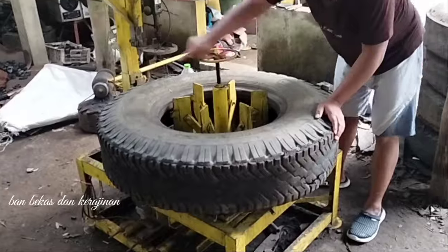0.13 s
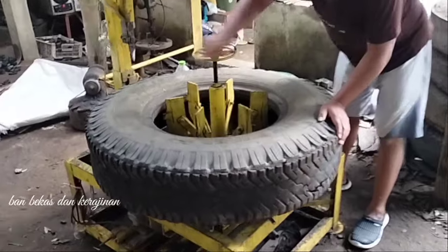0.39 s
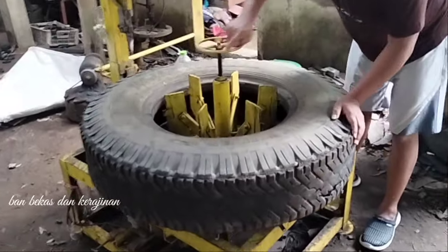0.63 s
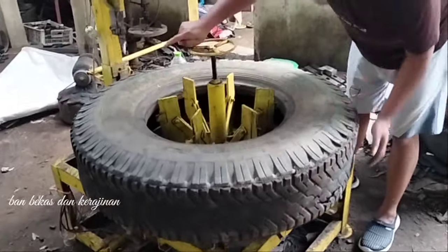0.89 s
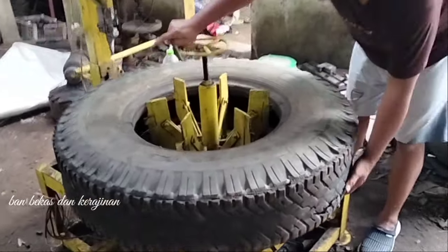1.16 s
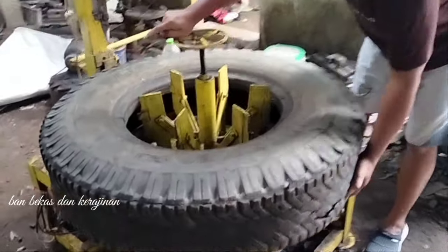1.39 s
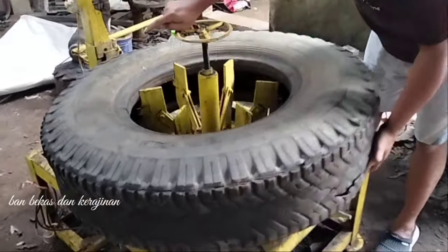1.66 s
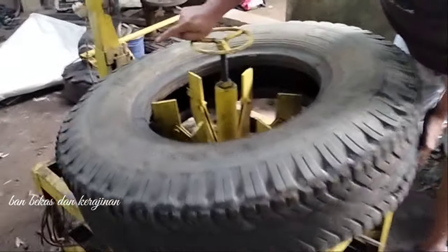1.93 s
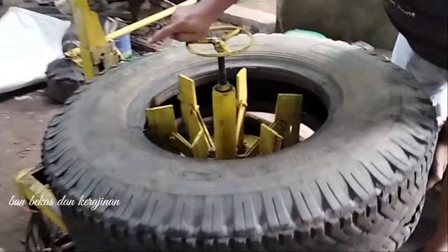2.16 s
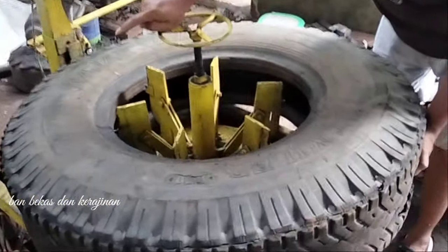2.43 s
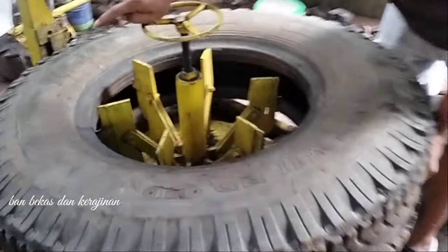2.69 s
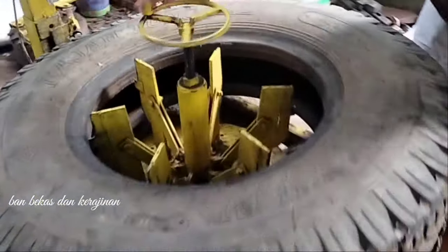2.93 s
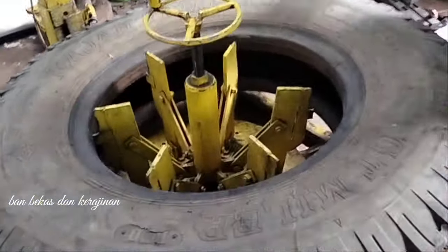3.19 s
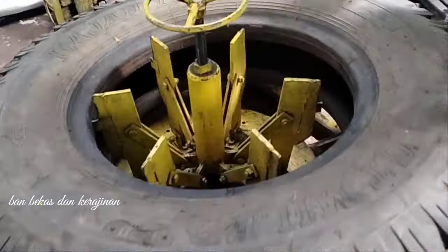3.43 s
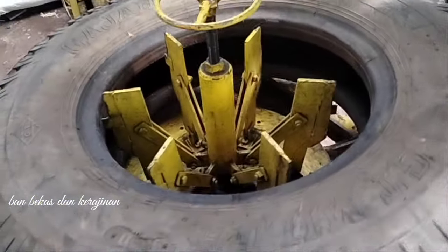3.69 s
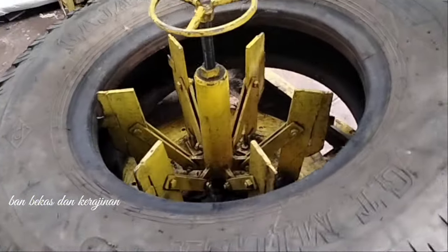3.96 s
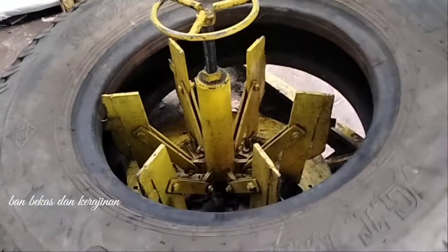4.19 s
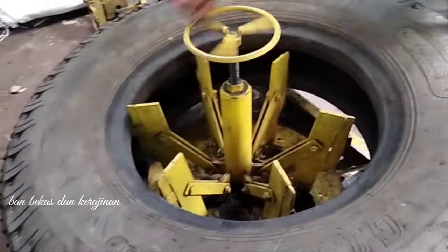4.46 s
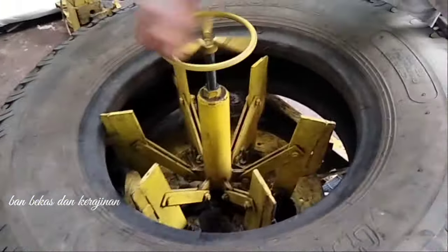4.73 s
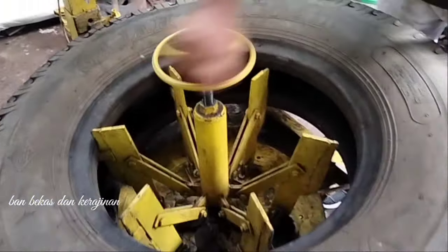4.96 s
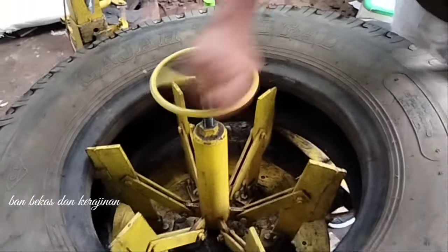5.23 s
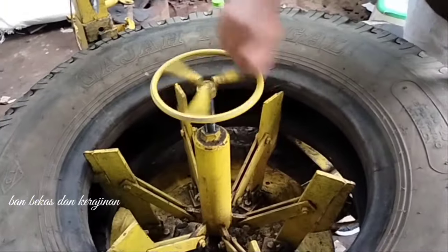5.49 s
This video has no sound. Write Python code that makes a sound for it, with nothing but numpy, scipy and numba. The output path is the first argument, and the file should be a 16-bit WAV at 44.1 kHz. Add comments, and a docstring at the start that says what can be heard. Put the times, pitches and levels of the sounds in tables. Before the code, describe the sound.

Irregular bright metal clinks and rattles in a workshop, loudest around two and four seconds, cut to silence, then resuming with a spun wheel.

```python
"""A steel clamping stand is struck and shaken as a heavy tyre is shifted on it; later a hand wheel is spun.
Blows excite resonant modes by noise bursts; plates and links rattle as bunches of decaying grains over rubbing.
Joints squeak by stick-slip tones, a bearing squeals thinly, a small part rings high, single frame modes waver.
Shaped noise gives the faint room hiss. All sound is muted for a moment before the wheel turns."""
import sys
import numpy as np
from scipy import signal
from scipy.fft import rfft, irfft, next_fast_len
from scipy.io import wavfile
from scipy.ndimage import uniform_filter1d
from numba import njit

SR = 44100
rng = np.random.default_rng(int(sys.argv[2]) if len(sys.argv) > 2 else 0)


def put_to_file(sound):
    """Save the sound as 16-bit audio at rate SR, in the file named by the first command-line argument."""
    columns = np.atleast_2d(sound).T  # one column per channel
    safe = np.clip(columns, -1, 1)
    whole_steps = np.round(safe * 32767)
    wavfile.write(sys.argv[1], SR, whole_steps.astype(np.int16))


def magnitude_from_level(level_db):
    """Linear magnitude for a level in decibels (20 dB per decade)."""
    exponent = np.asarray(level_db, float) / 20
    return 10 ** exponent


N = 247401  # samples


def colour(table, size):
    """Spectral envelope: gain at every bin, interpolated over log frequency from (freq_hz, level_db)."""
    freq_hz, level_db = np.transpose(table)
    bin_hz = np.arange(size // 2 + 1) * SR / size
    return magnitude_from_level(np.interp(np.log(bin_hz + 1), np.log(freq_hz), level_db))


def rings(modes, size):
    """Modal superposition: summed resonance curves of (freq_hz, centre level_db, t60_s) modes."""
    bin_hz = np.arange(size // 2 + 1, dtype=np.float32) * SR / size
    freq_hz, level_db, t60_s = np.array(modes, dtype=np.float32).T[:, :, None]
    # detuning in half bandwidths: a longer decay makes a narrower peak
    detuning = (bin_hz - freq_hz) * t60_s * np.float32(2 * np.pi / np.log(1000))
    real = magnitude_from_level(level_db) / (1 + detuning ** 2)
    return real.sum(axis=0) - 1j * (real * detuning).sum(axis=0)


def bands(spectrum, size):
    """Band splitting: bass, middle and treble signals; steel this small radiates no deep bass."""
    bass_hz, treble_hz = 1300, 9500  # crossovers
    f = np.arange(size // 2 + 1) * SR / size + 1
    low = 1 / (1 + (f / bass_hz) ** 8)
    high = 1 / (1 + (treble_hz / f) ** 16)
    radiated = 1 / (1 + (150 / f) ** 3)
    return [irfft(spectrum * gain, size) for gain in (low * radiated, 1 - low - high, high)]


def rms(x):
    """Effective value: root mean square."""
    return np.sqrt(np.mean(x ** 2))


def walk(rate, count=N):
    """Random modulation: normal levels drawn rate times a second, joined by slopes; spread just under 1."""
    hold = int(SR / rate)
    levels = np.repeat(rng.standard_normal(count // hold + 1), hold)
    return uniform_filter1d(levels, hold)[:count]


def add(out, start_s, x):
    """Linear superposition: mix x in from start_s."""
    i = int(start_s * SR)
    out[i:i + len(x)] += x[:N - i]


def partner(hz):
    """Modal clustering: each plate has a second cluster of modes a little under an octave from the first."""
    return np.where(hz < 3900, hz * 1.8, hz / 1.75)


@njit
def grains(starts, turn, fade, lengths, size, n):
    """Damped oscillation: each grain is one short decaying mode, a two-pole ring started from rest."""
    out = np.zeros(n)
    for k in range(len(starts)):
        feedback, damping = 2 * fade[k] * np.cos(turn[k]), fade[k] ** 2
        now, before = size[k] * np.sin(turn[k]), 0.
        for i in range(starts[k], min(n, starts[k] + lengths[k])):
            out[i] += now
            now, before = feedback * now - damping * before, now
    return out


# scrapes and rattles: start_s, held_s (from the start), level_db (middle band),
# bass_db and treble_db (both relative to the middle)
SCRAPES = [(-.03, 0.08, -35.5, -11.5, -13.5), (.2, 0.15, -51.5, -10, -14), (.4, 0.12, -46, -15.5, -15),
           (0.603, 0.037, -37.5, -19.5, -11.5), (0.703, .11, -42, -11.5, -9.5),
           (.94, 0.062, -60.5, -19, -19), (1.099, 0.056, -44, -19.5, -22), (1.2, 0.32, -61, -2.5, -29),
           (1.53, 0.026, -48, -2, -9), (1.842, 0.041, -51, -36, -15), (2.029, 0.27, -55, -4.5, -10),
           (2.35, 0.092, -42, -21, -22), (2.52, 0.073, -57.5, -23, -32), (2.644, 0.02, -36, -20, -13.5),
           (3.08, .14, -74, -15, -10), (3.29, .06, -46, -14, -19.5), (3.36, 0.071, -38, -8.5, -9.5),
           (3.56, 0.21, -53.5, -8, -17.5), (3.849, .11, -37, -9, -16), (3.97, 0.069, -43.5, -9.5, -18.5),
           (4.03, 0.089, -37, -16.5, -18), (4.13, 0.26, -43.5, -16.5, -23.5),
           (4.979, 0.028, -52, -15.5, -26), (5.12, 0.13, -52, -17.5, -12), (5.22, 0.1, -42.5, -10.5, -9),
           (5.309, 0.057, -45, -7.5, -7), (5.44, 0.093, -47, -20, -13.5)]
# relative spectral envelope of the steel, for rattle and blows: freq_hz, level_db
STEEL = [(35, -71), (60, -25), (345, -28.5), (537, -15.5), (590, -17.5), (694, -15.5), (762, -17),
         (1080, -16.5), (1460, -2.5), (2080, -0.5), (4090, 6), (5660, 6), (10600, -2.5), (13700, 17),
         (15800, 5)]


def rattle():
    """Granular contact noise: bunched tiny clinks, many near the pitch of the blows, over rubbing."""
    attack_s, fall_db_per_s = 0.018, 211.5
    tremble_db = (-77.5, -72.5, -81)  # the stand never quite rests: bass, middle, treble
    contact_count, clink_count = 1400, 14000
    t = np.arange(N) / SR
    power = np.ones((3, N)) * magnitude_from_level(np.array(tremble_db))[:, None] ** 2
    for start_s, held_s, level_db, bass_db, treble_db in SCRAPES:
        fall_db = fall_db_per_s * np.maximum(t - start_s - held_s, 0)
        shape = np.clip((t - start_s) / attack_s, 0, 1) * magnitude_from_level(level_db - fall_db)
        power += magnitude_from_level(np.array([[bass_db], [0], [treble_db]])) ** 2 * shape ** 2
    # the centre pitch glides from each blow's ring to the next
    centre_hz = np.interp(t, [blow[0] for blow in BLOWS], [blow[2] for blow in BLOWS])
    size = next_fast_len(N)
    when, near, spread, ring, big = rng.random(size=(clink_count, 5)).T
    # clinks come in bunches: one contact sets many small modes going at once
    contacts = np.sort(rng.random(contact_count))
    contact_index = (when * contact_count).astype(np.int64)
    starts = (contacts[contact_index] * (N - 1)).astype(np.int64)
    # some clinks gather in the two clusters, the rest lie anywhere
    cluster_hz = np.where(near < .28, centre_hz[starts], partner(centre_hz[starts]))
    clustered_hz = cluster_hz * 2 ** (.45 * (spread - .5))
    hz = np.where(near < .45, clustered_hz, 200 + 15300 * spread ** 1.6)
    decay_samples = (0.024 + 0.14 * ring) * SR / (1 + (hz / 7000) ** 3)  # high clinks die sooner
    grain_samples = decay_samples.astype(np.int64) * 2 // 3
    strengths = magnitude_from_level(-2.2 * np.log(big + .01))
    clinks = grains(starts, 2 * np.pi * hz / SR, magnitude_from_level(-60 / decay_samples), grain_samples, strengths, N)
    hiss = magnitude_from_level(-6.5) * rng.standard_normal(N)
    ticks = np.zeros(N)
    ticks[starts] = strengths
    # each contact also rasps briefly, falling 60 dB in 0.02 s
    rasp = signal.lfilter([1], [1, -magnitude_from_level(-60 / (.02 * SR))], ticks)
    rubbing = hiss * (0.95 + 0.78 * rasp / rms(rasp))
    contact_noise = (rubbing + clinks / rms(clinks)) * magnitude_from_level(2.0 * walk(90))
    spectrum = rfft(contact_noise, size) * colour(STEEL, size)
    parts = [band[:N] / rms(band) for band in bands(spectrum, size)]
    return (np.sqrt(power) * parts).sum(axis=0)


# frame modes that stand out: freq_hz, swell_s, t60_s, list of catches (start_s, level_db)
FRAME = [(190.7, 0.0033, 0.097, [(3.798, -50.5), (4.051, -46)]), (379, .002, 0.076, [(2.234, -41.5),
         (2.966, -56.5), (4.054, -36.5)]), (455, 0.0019, 0.074, [(1.533, -36), (3.797, -41)]),
         (622, 0.044, 0.18, [(.49, -50), (3.89, -32)]), (704, .01, 0.23, [(.64, -53.5), (.71, -48)]),
         (798, 0.046, 0.33, [(0, -37), (3.32, -36), (5.27, -32)]), (1160, 0.0042, 0.39, [(.706, -45.5),
         (.786, -48)]), (1263, 0.014, .28, [(2.062, -43), (2.103, -33.5)]),
         (1445, 0.0055, 0.34, [(2.646, -44), (3.884, -33)]), (2860, .005, 0.26, [(1.196, -39),
         (1.545, -31)]), (3350, .005, 0.56, [(1.11, -43.5), (2.428, -48.5)]),
         (5080, 0.0042, 0.24, [(.2, -36), (.475, -40), (.76, -39.5)]), (7420, .003, .2, [(2.428, -38),
         (4.024, -44.5)]), (8650, .004, .1, [(2.37, -51), (3.71, -51)]), (8500, 0.0033, 0.13, [(3.739, -45),
         (5.165, -44.5)]), (10040, 0.0056, 0.2, [(.765, -47.5)]), (13900, .01, .33, [(1.99, -60),
         (3.74, -53.5)])]


def clangs():
    """Modal resonance: single modes of the frame, with randomly wavering level and pitch."""
    out, t = np.zeros(N), np.arange(SR // 3) / SR
    for hz, swell_s, t60_s, catches in FRAME:
        for start_s, level_db in catches:
            waver_db = 4.2 * walk(120, len(t))
            shape = np.minimum(t / max(swell_s, .001), 1) * magnitude_from_level(-60 * t / t60_s + waver_db)
            phase = 2 * np.pi * np.cumsum(hz + 45 * walk(130, len(t))) / SR
            add(out, start_s, magnitude_from_level(level_db) * shape * np.sin(phase))
    return signal.sosfilt(signal.butter(2, 130, "high", fs=SR, output="sos"), out)


# relative spectral envelope of the room hiss: freq_hz, level_db
ROOM = [(18, -43), (30, -4), (81, -23), (183, -3.5), (362, -10.5), (628, -24), (1990, -13), (3030, -1.5),
        (3740, -13.5), (5990, -4), (7010, -14.5), (8870, -19), (10700, -40.5), (14600, -18), (15800, -29.5)]
# humps on that envelope: freq_hz, width_hz, height_db
ROOM_PEAKS = [(3050, 620, 1), (5900, 510, 0.5), (8400, 320, 9.5), (11580, 170, 19.5), (14600, 440, 6)]


def room():
    """Filtered noise: a faint, slowly wavering workshop hiss with a few narrow humps."""
    level_db = -66
    size = next_fast_len(N)
    f = np.arange(size // 2 + 1) * SR / size
    humps_db = sum(db * np.exp(-((f - hz) / width) ** 2) for hz, width, db in ROOM_PEAKS)
    spectrum = rfft(rng.standard_normal(size)) * colour(ROOM, size) * magnitude_from_level(humps_db)
    hiss = irfft(spectrum, size)[:N]
    return magnitude_from_level(level_db + 1.1 * walk(2.9)) * hiss / rms(hiss)


# blows: start_s, peak_db (middle band), ring_hz (of the struck part),
# bass_db (relative to the middle's attack rms), t60_s (of the throbbing noise tail)
BLOWS = [(.004, -31, 2263, -32, 0.51), (.184, -31, 4530, -39, 0.18), (.2095, -26, 5340, -33, 0.27),
         (.3122, -32.5, 5560, -23, 0.35), (.3213, -33, 2600, -27, 0.27), (.412, -34, 4730, -10.5, 0.27),
         (.4287, -27.5, 2800, -45, .13), (.4609, -27.5, 4880, -47, 0.21), (.4809, -36, 4490, -6, 0.12),
         (.6148, -25.5, 4790, -47, 0.038), (.634, -34, 4740, -41, 0.09), (.6396, -24, 5240, -44, 0.2),
         (.7191, -35.5, 3860, -14, 0.38), (.793, -28, 3610, -12, 0.24), (.9386, -45, 5580, -26, .12),
         (1.056, -39.5, 5650, -19, 0.15), (1.1141, -28.5, 2960, -52, .36),
         (1.1936, -29.5, 2360, -14.5, 0.32), (1.2172, -27, 2870, -26, 0.42),
         (1.3133, -28.5, 4700, -30, 0.34), (1.4019, -31, 2790, -14, .34), (1.482, -35.5, 2720, -16, 0.4),
         (1.5291, -29, 1710, -6, 0.29), (1.5421, -20.5, 2575, -22, 0.25), (1.5584, -27, 2940, -16.5, 0.32),
         (1.7681, -37.5, 5610, -29, 0.51), (2.0608, -30, 2740, -20.5, 0.34), (2.1013, -12, 2965, -28, 0.26),
         (2.1311, -21, 2990, -26, 0.3), (2.2345, -30, 4570, -12, 0.2), (2.31, -35.5, 3280, -17, 0.31),
         (2.3448, -28, 3050, -26, 0.039), (2.3515, -26.5, 3050, -20, 0.24), (2.3637, -21, 4890, -26, 0.097),
         (2.4262, -26.5, 3220, -30, 0.22), (2.6457, -25.5, 5960, -32, .32), (2.763, -36.5, 5900, -44, 0.25),
         (2.9642, -55.5, 3100, -14.5, 0.18), (3.089, -47.5, 3330, -27, 0.15), (3.1222, -53, 3470, -34, .1),
         (3.1333, -45, 3680, -40, .1), (3.2396, -36, 5560, -18.5, 0.27), (3.256, -30, 5630, -49.5, 0.25),
         (3.3101, -27, 4610, -16.5, .27), (3.3354, -15.5, 5050, -48, 0.15),
         (3.3454, -18.5, 5400, -51, 0.48), (3.366, -28.5, 4010, -12.5, 0.27),
         (3.554, -36.5, 4920, -14, 0.41), (3.573, -25.5, 5900, -41.5, 0.053),
         (3.5844, -26.5, 5250, -30.5, 0.16), (3.6114, -34.5, 5160, -33, 0.24),
         (3.6778, -29, 3540, -30.5, 0.1), (3.686, -26.5, 4300, -25, 0.27), (3.6941, -28, 5130, -12, 0.07),
         (3.787, -28.5, 5400, -12, 0.2), (3.7955, -21.5, 4260, -16.5, 0.22), (3.8218, -15, 3430, -22, 0.2),
         (3.8575, -19, 4170, -25, 0.38), (4.0239, -20.5, 7180, -34, 0.2), (4.0521, -23, 5480, -13, 0.097),
         (4.1015, -25, 5430, -23, .17), (4.126, -27.5, 5297, -27, .28), (4.2575, -24.5, 3496, -15.5, 0.32),
         (4.2844, -22, 5710, -20, 0.19), (4.9161, -45.5, 5620, -31, 0.09), (4.988, -39.5, 5080, -19, 0.19),
         (5.0894, -40, 5470, -7, .04), (5.1643, -28.5, 4370, -26, 0.31), (5.2257, -29.5, 4180, -18, 0.58),
         (5.248, -18.5, 4940, -38, 0.4), (5.2844, -23.5, 3200, -18.5, 0.42), (5.3394, -36, 4480, -25, .12),
         (5.462, -26, 4520, -55, 0.21), (5.5726, -29, 2500, -20, 0.36)]
# modes of the stand: freq_hz, level_db (relative), t60_s (before damping)
STAND = [(595, -17, 0.15), (780, -28, 5.0), (1097, -17.5, 0.7), (1288, -13.5, 1.3), (1410, -27, 5.0),
         (1675, -26, 5.0), (2035, -13, 0.52), (2377, -7.5, 0.44), (2790, -15, 0.63), (3200, -5.5, 1.3),
         (3940, -9, 0.56), (4260, -2.5, 5.0), (4760, 1, 0.56), (4890, -1, 0.51), (5270, 0, 0.3),
         (5880, -14, 1.4), (7020, -2, 0.27), (8540, -22, 5.0), (8600, -29.5, 5.0), (10930, -47, 5.0),
         (10510, -44, 0.98), (10400, -35, 2.8), (13700, -37.5, 1.6), (12600, -33.5, 5.0),
         (13450, -26, 0.97), (13460, -28.5, 5.0), (14000, -29, 5.0), (14100, -31.5, 5.0)]


def blows():
    """Impact excitation: a noisy crack and throbbing tail ring another mix of the stand's modes each time."""
    slowest_throb_s = .0105
    # smaller parts are brighter, heavier blows duller
    middling_treble_db, treble_db_per_octave, duller_db_per_db = -26.5, 10, 0.47
    out, size, lead = np.zeros(N), 12288, 256  # size and lead-in in samples
    t = np.maximum(np.arange(size) - lead, 0) / SR
    steel, f = colour(STEEL, size), np.arange(size // 2 + 1) * SR / size
    for start_s, peak_db, hz, bass_db, t60_s in BLOWS:
        brighter_db = treble_db_per_octave * np.log2(hz / 4000)
        treble_db = middling_treble_db + brighter_db - duller_db_per_db * (peak_db + 31.5)
        # the level of the tail throbs quickly, at another rate in each blow
        throb_s = slowest_throb_s * rng.uniform(.7, 1.0)
        throb = magnitude_from_level(3.4 * np.cos(2 * np.pi * (t - .002) / throb_s))
        tail = magnitude_from_level(-60 * t / max(t60_s, .01)) * magnitude_from_level(-9.5) * throb
        crack = magnitude_from_level(-60 * t / 0.013 - 13 * t60_s)  # long scrapes start with less of a crack
        push = rng.standard_normal(size) * (tail + crack) * np.minimum(t / 0.0014, 1)
        # every blow lands elsewhere; hands and rubber damp the long rings
        chance = rng.standard_normal((len(STAND), 2))
        stand_modes = [(mode_hz * (1 + .015 * shift), mode_db + 17 + 6 * gain, min(decay_s, .12))
                       for (mode_hz, mode_db, decay_s), (shift, gain) in zip(STAND, chance)]
        # the part that is hit: its ring and two broad clusters of close modes
        struck = [(hz, 16, .09), (hz, 11, .004), (partner(hz), 8, .004)]
        soft = 1 / (1 + (f / (2.4 * hz)) ** 2)  # a lower part is bigger and takes a longer push
        response = steel * (1 + rings(struck, size)) + rings(stand_modes, size)
        low, mid, high = bands(rfft(push) * soft * response, size)
        attack = slice(lead, lead + 600)
        scale = magnitude_from_level(peak_db) / np.abs(mid[attack]).max()
        # bass and treble are set against the middle over the attack
        body = scale * rms(mid[attack])
        bass = magnitude_from_level(bass_db) * low / rms(low[attack])
        treble = magnitude_from_level(treble_db) * high / rms(high[attack])
        add(out, max(start_s - lead / SR, 0), scale * mid + body * (bass + treble))
    return out


# squeaking joints: start_s, length_s (before the fall), first_hz, held_hz, level_db,
# second_db and third_db (partials relative to the first, at full grip)
SQUEAKS = [(.183, .045, 5900, 4700, -33, -20, -14), (.46, .035, 5200, 4750, -32, -22, -16),
           (4.839, .018, 3780, 3810, -44, -8, -30), (5.133, .012, 3950, 3600, -39, -14, -25)]


def squeaks():
    """Stick-slip friction: rough tones that settle from a first pitch to a held one."""
    out = np.zeros(N)
    for start_s, length_s, first_hz, held_hz, level_db, second_db, third_db in SQUEAKS:
        t = np.arange(int((length_s + 0.086) * SR)) / SR
        glide_hz = held_hz + (first_hz - held_hz) * np.exp(-t / 0.0073)
        hz = glide_hz * (1 + 0.008 * walk(430, len(t)))
        phase = 2 * np.pi * np.cumsum(hz) / SR
        level = magnitude_from_level(-600 * np.maximum(t - length_s, 0) + 2.6 * walk(102, len(t)))
        shape = np.minimum(t / (0.032 * length_s), 1) * level
        shape = shape * magnitude_from_level(2.3 * np.cos(2 * np.pi * 125 * t))  # the level throbs
        # overtones grow, raggedly, as it bites
        grip = np.minimum(t / length_s, 1) * magnitude_from_level(7.6 * walk(400, len(t)))
        overtones = magnitude_from_level(second_db) * np.sin(2 * phase) + magnitude_from_level(third_db) * np.sin(3 * phase)
        add(out, start_s, magnitude_from_level(level_db) * shape * (np.sin(phase) + grip * overtones))
    return out


# bearing squeal: start_s, length_s, pitch_hz (at the middle), level_db (before a 2 dB lift)
SQUEAL = [(0.234, .17, 5600, -55), (.94, .17, 5520, -59.5), (1.709, 0.26, 5480, -59.5),
          (2.51, 0.16, 5530, -60), (2.765, 0.069, 5610, -50.5), (3.175, 0.14, 5530, -54),
          (4.88, 0.25, 5470, -61.5)]


def squeal():
    """Self-excited friction: a thin wavering bearing squeal sags, with a weaker tone an octave below."""
    sag_hz_per_s, edge_s = 200, 0.018
    out = np.zeros(N)
    for start_s, length_s, pitch_hz, level_db in SQUEAL:
        t = np.arange(0, length_s, 1 / SR)
        hz = pitch_hz - sag_hz_per_s * (t - length_s / 2) + 30 * walk(145, len(t))
        phase = 2 * np.pi * np.cumsum(hz) / SR
        waver_db = 2.8 * walk(83, len(t))
        edge = np.clip(np.minimum(t, length_s - t) / edge_s, 0, 1)
        tone = np.sin(phase) + magnitude_from_level(-17.5) * np.sin(phase / 2)
        add(out, start_s, edge * magnitude_from_level(level_db + 2 + waver_db) * tone)
    return out


# high ring: start_s, held_s, level_db
PINGS = [(1.858, 0.043, -27), (2.647, 0.014, -51), (2.765, 0.038, -40)]
# its modes: freq_hz, level_db (added to the ring's level), t60_s
PING_MODES = [(5993, -3.5, 0.21), (12750, -21, .2), (15100, -33.5, .2)]


def pings():
    """Free decay: a small hard part sings while rubbed and then rings out in its own modes."""
    out, t = np.zeros(N), np.arange(SR // 3) / SR
    for start_s, held_s, level_db in PINGS:
        for hz, mode_db, t60_s in PING_MODES:
            decay_db = -60 * np.maximum(t - held_s, 0) / t60_s
            shape = np.minimum(t / 0.011, 1) * magnitude_from_level(decay_db + 0.66 * walk(100, len(t)))
            tone = np.sin(2 * np.pi * (hz * t + rng.random()))
            add(out, start_s, magnitude_from_level(level_db + mode_db) * shape * tone)
    return out


def scene():
    """Superposition: all sources add at one microphone."""
    return (rattle() + clangs() + room() + blows() + squeaks() + squeal() + pings())[None]


def low_pass(x):
    """Removes everything above the highest recorded frequency."""
    return signal.sosfilt(signal.butter(12, 16410, fs=SR, output="sos"), x)


def record(dry):
    """High-pass filtering and gating: the microphone drops the deepest bass; the sound is muted briefly."""
    mute_start_s, mute_end_s, fade_s = 4.322, 4.737, 0.0011
    t = np.arange(N) / SR
    gate = np.clip(np.maximum(mute_start_s - t, t - mute_end_s) / fade_s, 0, 1)
    heard = signal.sosfilt(signal.butter(2, 45, "high", fs=SR, output="sos"), dry)
    return low_pass(heard * gate)


dry = scene()
out = record(dry)
put_to_file(out)
```